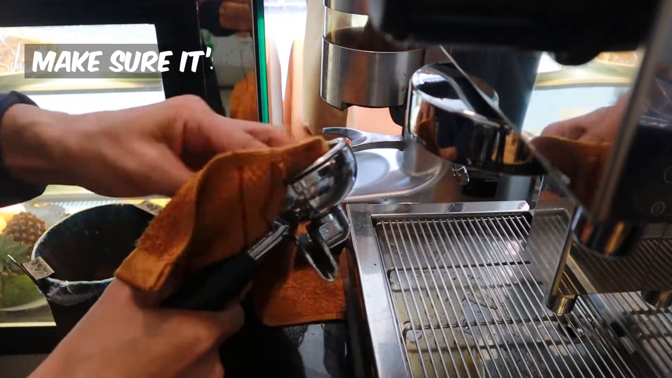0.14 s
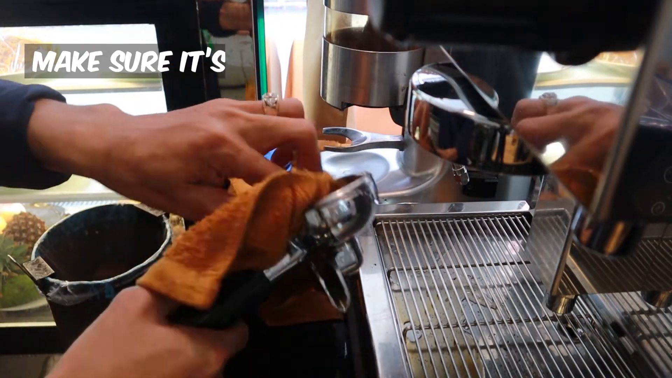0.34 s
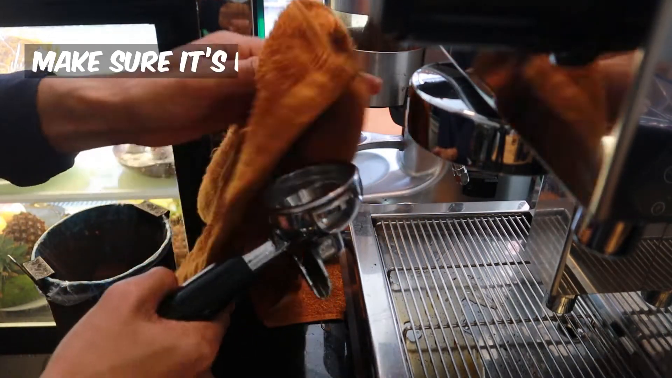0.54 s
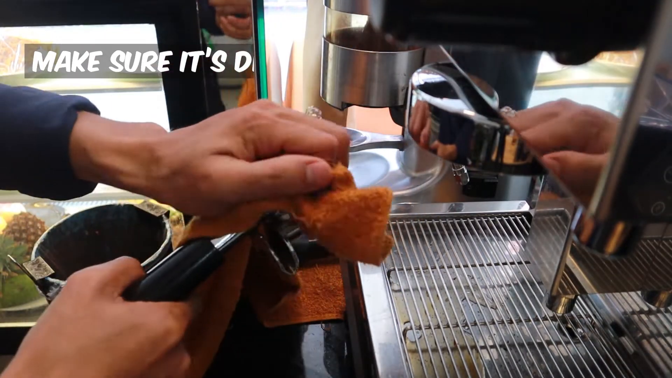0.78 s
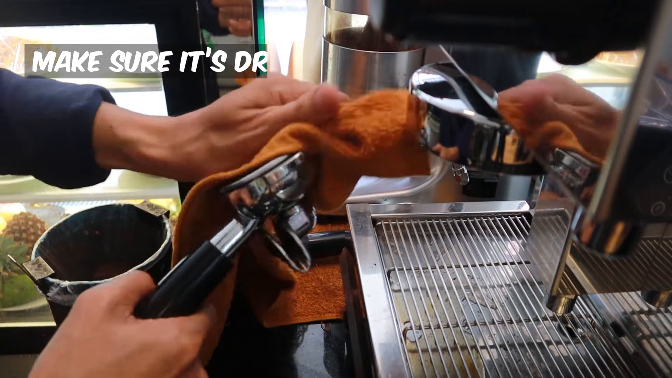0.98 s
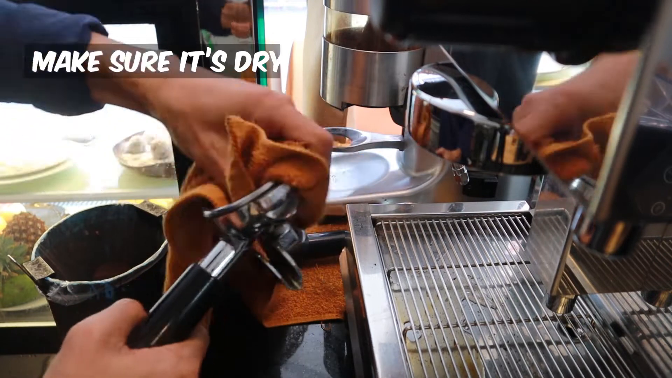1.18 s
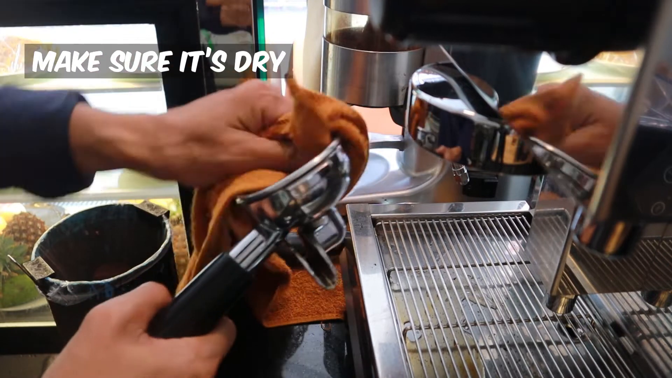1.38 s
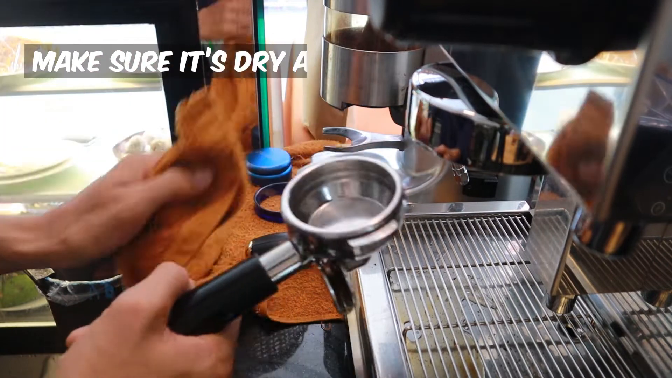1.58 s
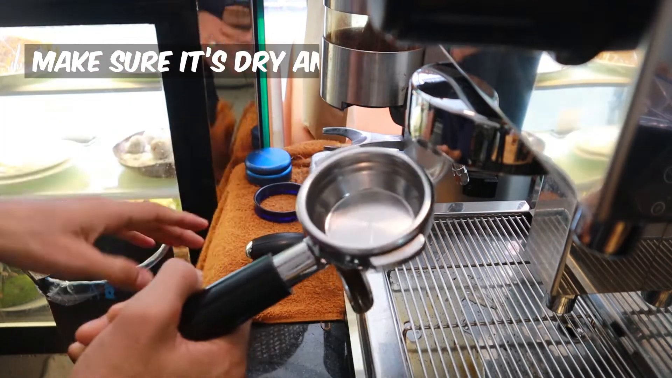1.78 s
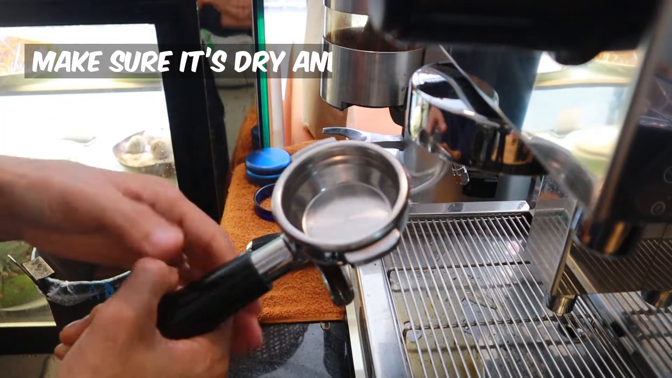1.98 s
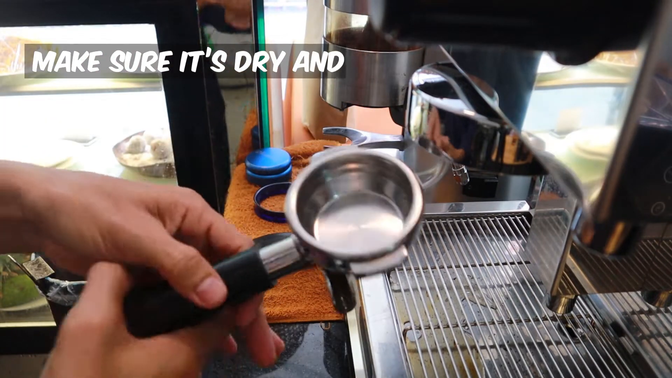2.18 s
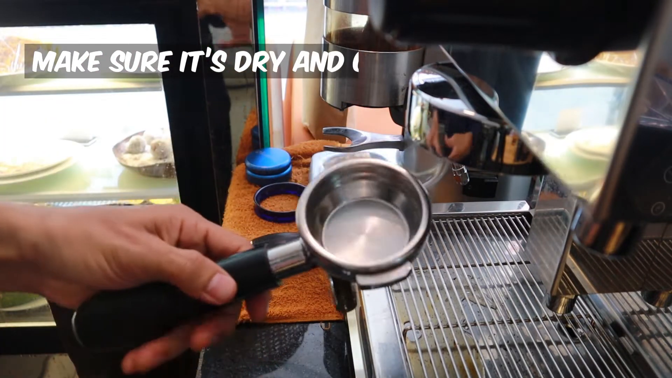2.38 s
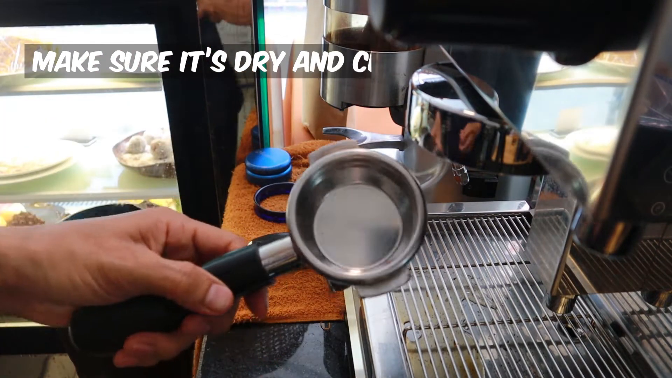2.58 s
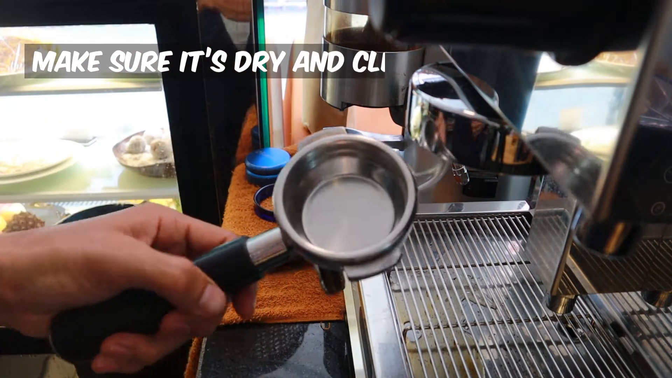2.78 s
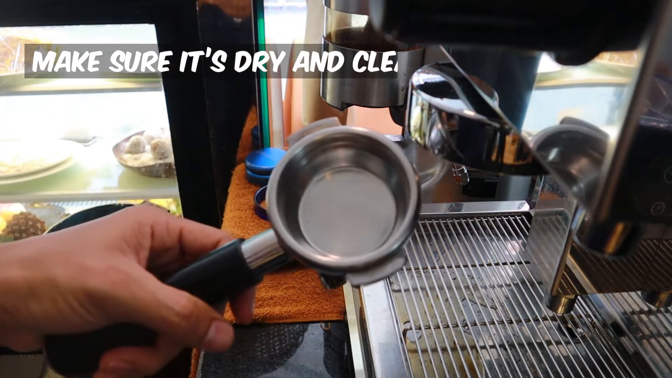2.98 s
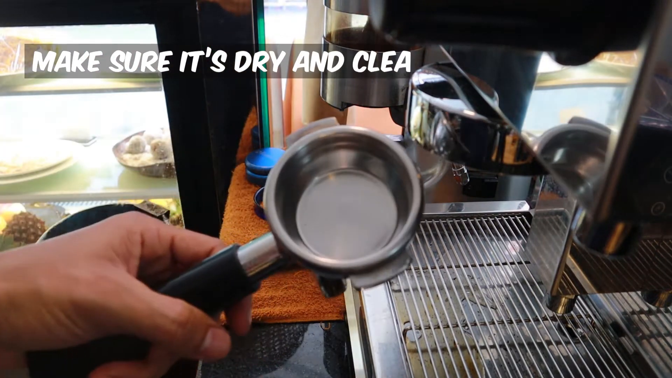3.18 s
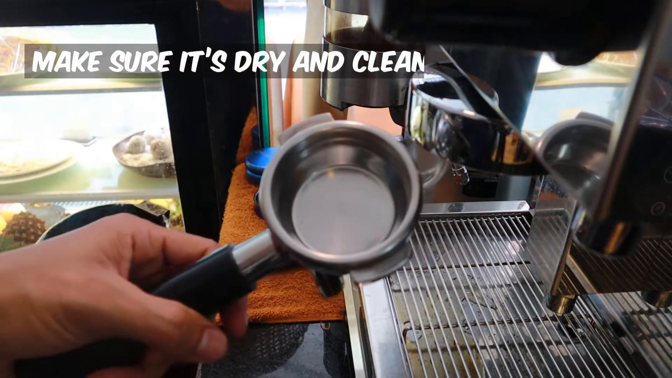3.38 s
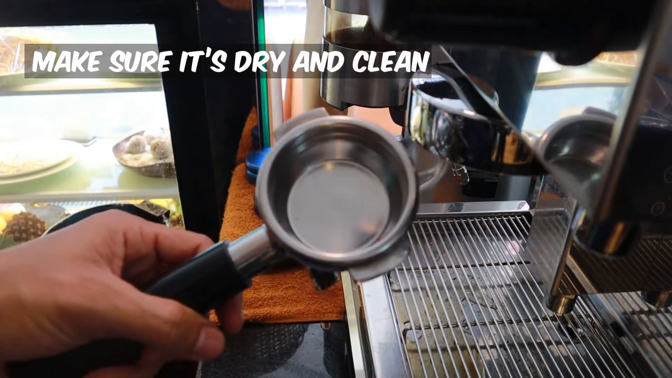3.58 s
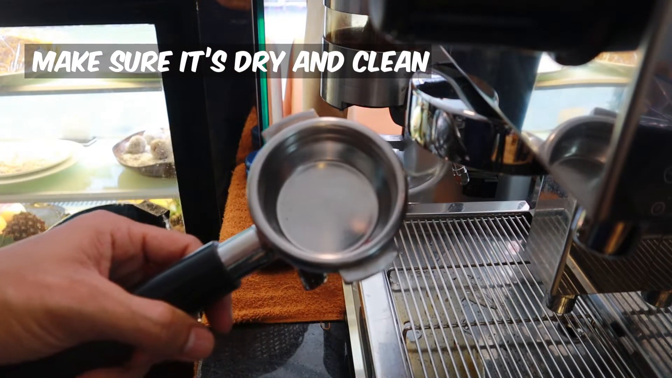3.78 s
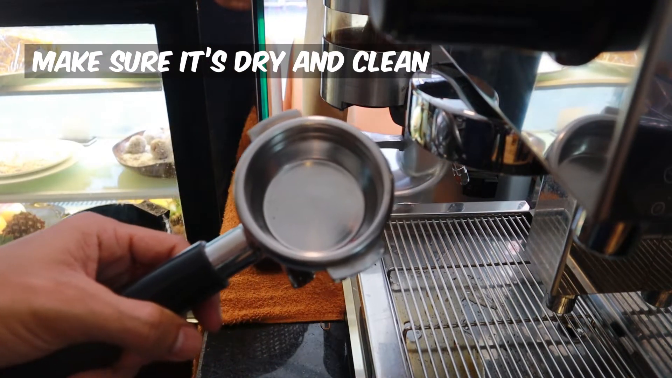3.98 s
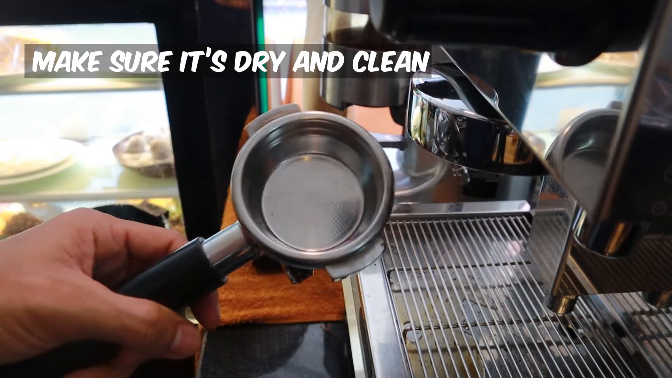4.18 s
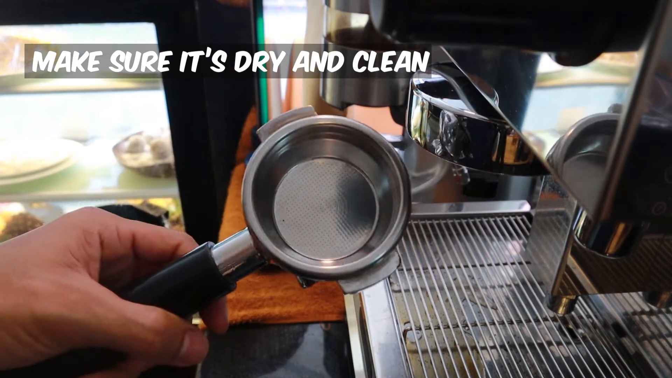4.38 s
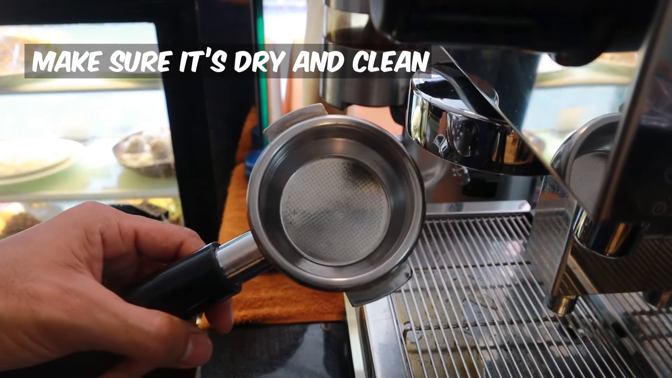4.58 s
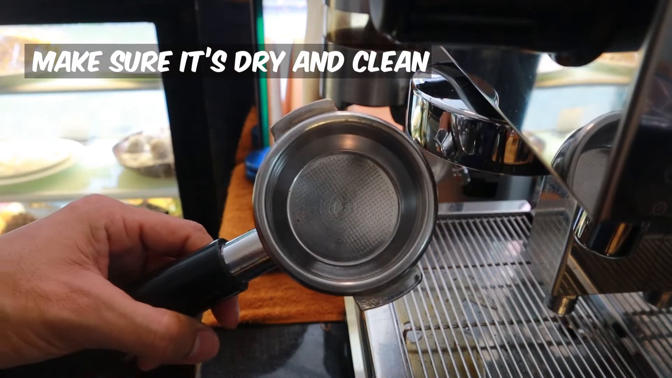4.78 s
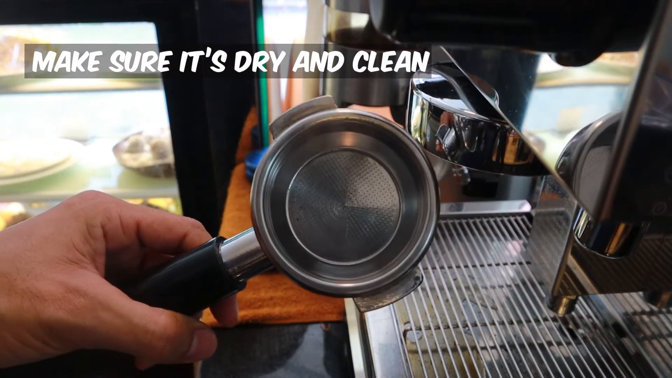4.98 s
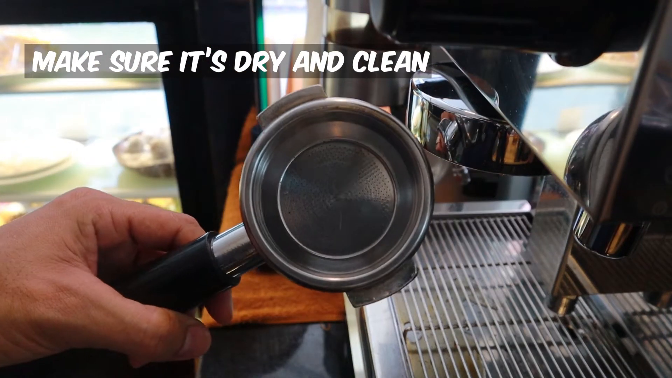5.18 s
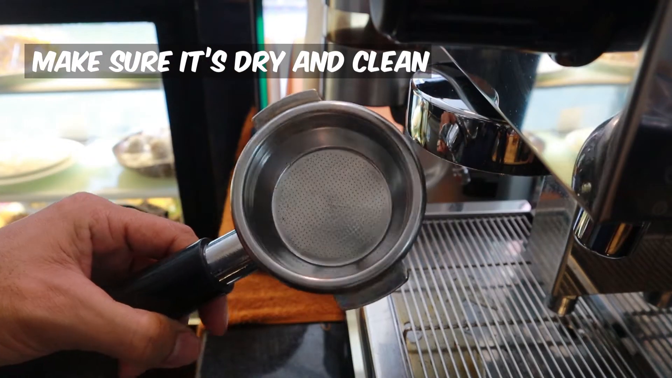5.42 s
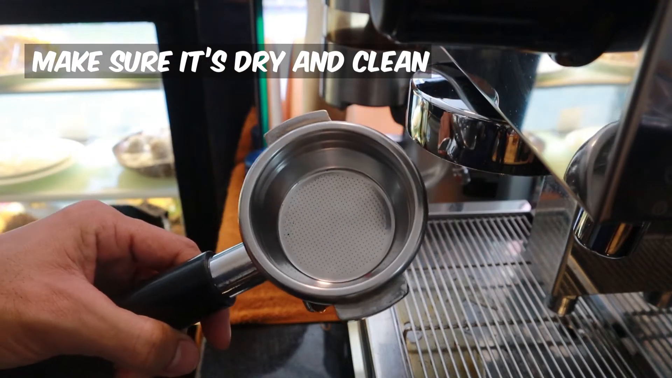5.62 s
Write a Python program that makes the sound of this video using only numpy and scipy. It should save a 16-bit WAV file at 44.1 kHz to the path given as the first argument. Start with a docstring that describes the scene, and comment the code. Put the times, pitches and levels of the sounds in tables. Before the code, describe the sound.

Close, dry wiping of a cloth inside a steel coffee filter basket. Short rasping strokes come several per second, each tipped with crisp metallic ticks and a rare tiny squeak. A dull, low, humming room lies underneath. After about 2.3 seconds comes a brief gap of near silence, then a second bout, slightly softer and ringier, ending just before 4 seconds; the rest is virtually silent. Nearly mono, centred, with hardly any echo.

```python
"""At a counter in a dull, humming room, a cloth is twisted in quick strokes inside a steel coffee filter basket.
Rasp: noise and sharp snags follow the strength of each stroke, and the steel cup rings along with them.
Snaps and squeaks: when the cloth slips free there is a tiny noise burst; when it chatters, a short tone.
Room: a wash of shaped noise with wavering hums lies under three bouts of wiping, the last two almost joined.
Between and after the bouts there is near silence."""
import sys
import numpy as np
from scipy import signal
from scipy.fft import rfft, irfft, next_fast_len
from scipy.io import wavfile
from scipy.ndimage import uniform_filter1d

SR = 44100
rng = np.random.default_rng(int(sys.argv[2]) if len(sys.argv) > 2 else 0)


def materialize(psi):
    """Save the field psi as 16-bit PCM at rate SR to the path in sys.argv[1].

    A 1-D psi becomes a single channel; in a 2-D psi each row is a channel.
    """
    bounded = np.clip(np.atleast_2d(psi).T, -1, 1)
    quanta = np.round(bounded * 32767).astype(np.int16)
    wavfile.write(sys.argv[1], SR, quanta)


N = 249160
TIME = np.arange(N) / SR
EDGE_HZ = 10100  # upper edge of the whole sound

# strokes of the cloth; build_db is the change in level from start to end:
# start_s, length_s, end_level_db, build_db
STROKES = [(0, 0.057, -45, -11.5), (0.171, 0.067, -42.5, 2), (0.263, 0.089, -39.5, 11.5),
           (0.437, 0.058, -35.5, 13.5), (0.519, 0.091, -39.5, 10.5), (0.749, 0.079, -39, 7),
           (0.829, .082, -36.5, 8.5), (0.974, 0.073, -36.5, 9), (1.075, 0.073, -34, 15),
           (1.265, 0.1, -38, 15.5), (1.393, 0.026, -35, 13.5), (1.543, .095, -38.5, 6.5),
           (1.654, 0.028, -36.5, 3.5), (1.752, 0.11, -38, 9), (1.874, 0.04, -39.5, -1),
           (1.98, 0.068, -38.5, 10), (2.079, 0.08, -40, 9), (2.185, 0.043, -55.5, -4),
           (2.231, 0.06, -40, 7), (2.585, 0.13, -43.5, 3.5), (2.724, 0.056, -41.5, -1.5),
           (2.806, 0.096, -42.5, -4.5), (3.024, 0.073, -38, 12.5), (3.168, 0.15, -43, 2.5),
           (3.331, 0.069, -45.5, -3.5), (3.415, 0.078, -44.5, -3.5), (3.525, 0.037, -43, -2.5),
           (3.569, 0.16, -40.5, -2), (3.81, 0.092, -37.5, 7.5), (3.886, 0.054, -40.5, 9.5)]
# bouts of wiping, with light brushing between the strokes:
# start_s, end_s, brushing_db, room_db
BOUTS = [(0, 2.346, -61, -59), (2.585, 3.765, -57, -57.5), (3.794, 3.947, -53, -57.5)]
# overall tone of the rasp; only the differences between levels count:
# pitch_hz, level_db
RASP_TONE = [(100, -11), (350, -11), (550, -3.5), (900, -5), (1800, 0.5), (2900, -0.5), (4400, -3),
             (5400, -9.5), (6200, -13), (7100, -19.5), (7800, -28.5), (9200, -36.5), (10200, -61)]
# resonances of the cup and its holder, before the cup opens or closes:
# pitch_hz, width_hz, level_db
CUP_RESONANCES = [(1231, 70, -1), (1286, 49, 9), (1387, 70, 7), (1450, 40, 1), (2050, 210, -4.5),
                  (3570, 83, -3.5), (5400, 450, -0.5), (6600, 600, -8.5)]
# how freely the cup rings under the cloth:
# time_s, level_db
CUP_OPENNESS = [(0, -2), (2.7, 4), (3.7, 2), (3.85, 0)]
# moments when the cloth slips free; swell_s sets both the rise and the fall, rim_db is rim over cup:
# middle_s, level_db, swell_s, rim_db
SNAPS = [(0.029, -29, 0.0026, 2), (.175, -37, 0.00096, -8), (.222, -30, 0.0016, -5),
         (0.2516, -16.5, 0.00068, 8), (0.2962, -41, .0027, -2.5), (0.3313, -32.5, 0.0015, 6),
         (0.3485, -25, 0.002, 5.5), (0.4495, -38, 0.0013, -4.5), (0.4994, -23, 0.0015, 3.5),
         (0.555, -39.5, 0.0043, -1), (0.5832, -33, 0.0008, -3.5), (0.606, -24.5, 0.0028, 10.5),
         (0.761, -41, 0.0018, -8.5), (0.8171, -16.5, 0.00053, 11), (0.9095, -23.5, 0.0018, 8.5),
         (1.0458, -23.5, 0.0017, 7.5), (1.093, -35, 0.0019, -10), (1.144, -23.5, 0.00094, 9),
         (1.2962, -37, 0.0011, -10), (1.3249, -33, 0.0016, -2), (1.345, -21.5, 0.0011, 9.5),
         (1.401, -31, .0026, -3.5), (1.4188, -23.5, 0.0011, -12), (1.615, -24.5, 0.0013, 7.5),
         (1.689, -23.5, 0.0019, 6), (1.7683, -37.5, 0.0029, -9), (1.8255, -21, .0013, 6),
         (1.9081, -21.5, .0012, 5), (2.055, -21.5, 0.00078, 1), (2.1055, -36.5, 0.0028, 0),
         (2.154, -25, 0.0016, 0.5), (2.2364, -39, 0.00097, 3), (2.2665, -33.5, 0.0016, -5.5),
         (2.2849, -24, 0.0021, 1), (2.587, -39, 0.00048, -8), (2.7345, -37.5, 0.0016, -14.5),
         (2.7509, -20.5, 0.00096, 0), (2.8065, -34, 0.003, -7), (2.8253, -28, 0.0016, 3),
         (2.8797, -34.5, 0.0028, -26), (2.8966, -24, 0.00081, -2), (3.0331, -35, 0.00046, 0.5),
         (3.1, -21.5, 0.00095, -1.5), (3.2362, -27, 0.0023, -1), (3.3112, -24, 0.00092, -3.5),
         (3.3787, -30, .0014, -6), (3.418, -24.5, 0.0016, 1.5), (3.4739, -31.5, 0.0004, 2.5),
         (3.524, -25, 0.0016, -3), (3.5966, -22, 0.00088, -1), (3.648, -41, 0.0014, 6.5),
         (3.669, -24.5, 0.0016, -6.5), (3.74, -23.5, .0011, -5.5), (3.8034, -46, 0.0016, 10),
         (3.8643, -38, 0.00063, 0), (3.8814, -34.5, .01, -0.5), (3.94, -36, 0.0019, 16)]
# tone of the three parts of a snap; only the differences between levels count:
# pitch_hz, level_db
SNAP_CUP_TONE = [(100, -25.5), (400, -22), (850, -14), (1150, -2.5), (1400, 2), (1750, -4.5), (2200, -21.5),
                 (3500, -59.5)]
SNAP_RIM_TONE = [(1200, -40.5), (1750, -7.5), (2150, 9.5), (2600, -1), (3100, -12), (4200, -53)]
SNAP_SIZZLE_TONE = [(1900, -37), (2800, -2.5), (3600, 3.5), (4400, 1), (5300, 4), (6200, -8), (7100, -5.5),
                    (8000, -17.5), (8900, -21), (10200, -59)]
# short squeaks of cloth chattering on steel; swell_s sets both the rise and the fall:
# middle_s, peak_db, pitch_hz, swell_s
SQUEAKS = [(.029, -31, 2020, 0.0023), (0.063, -38, 1797, 0.0059), (0.085, -48.5, 1855, 0.015),
           (.361, -44, 905, 0.0064), (1.421, -20.5, 2205, 0.0024), (1.85, -30.5, 1420, 0.0031),
           (2.618, -39, 1350, 0.0044), (2.705, -39, 1140, .005), (2.851, -37, 1360, 0.0062),
           (2.969, -49, 2260, 0.0055), (3, -35.5, 995, 0.0035), (3.077, -32, 1370, 0.0044),
           (3.188, -29, 1385, 0.003), (3.353, -35, 1440, 0.0048), (3.722, -37.5, 1280, 0.0047)]
# tone of the room's wash; only the differences between levels count:
# pitch_hz, level_db
ROOM_TONE = [(20, -17.5), (55, -1.5), (100, 1.5), (150, -1), (260, -1), (380, -1.5), (1400, 0), (2500, -12),
             (5000, -30.5), (7500, -39), (10000, -57.5)]
# unsteady hums of machines, compared with the wash; the first also gets LOW_HUM_LIFT:
# pitch_hz, level_db
HUMS = [(95, -11.5), (212, -17.5), (305, -15), (500, -14), (609, -19.5)]
# changing lift of the first, lowest hum:
# time_s, lift_db
LOW_HUM_LIFT = [(0, -5.5), (.9, -6), (1.2, 4), (2.3, -0.5), (2.9, -5.5), (3.6, 3), (3.9, 4.5)]

# how quickly strokes and bouts begin, how fast a stroke dies away, how slowly a bout fades
GRIP_S, RELEASE_DB_PER_S, BOUT_FADE_S = .008, 521, 0.018
ROOM_REST_DB = -104  # the wash outside the bouts
# a snap sizzles more the harder it is, the more it rings the rim and the later it comes
SIZZLE_DB, SIZZLE_PER_DB, SIZZLE_PER_RIM_DB, SIZZLE_DB_PER_S = 7.5, 0.18, 0.38, 0.78


def rasp(lump_db=1, lump_hz=70, grain_db=0.5, grain_hz=600, snags_per_s=70, snag_size=7,
         drift=0.00591, soft_db=-56, soft_slope=0.27, level_db=-0.6, cup_swing_db=2):
    """Countless fibres slip in clumps and a few snag; a barely touching cloth loses its rasp."""
    rub_db = rubbing()
    # below soft_db the sound weakens faster than the rubbing
    force = amp(rub_db - soft_slope * np.maximum(soft_db - rub_db, 0))
    touching = np.clip((rub_db + 78) / 6, 0, 1)
    clumps = amp(lump_db * wander(lump_hz) + grain_db * wander(grain_hz))
    weave, steel = clumps * rng.standard_normal((2, N))
    is_snag = rng.random(N) < snags_per_s / SR
    snags = snag_size * rng.standard_normal(N) * is_snag
    # the cup rings unevenly as folds cover it
    openness = amp(np.interp(TIME, *np.transpose(CUP_OPENNESS)) + cup_swing_db * wander(25))
    cup = openness * basket(steel, 1 + drift * wander(3.7))
    friction = folds(weave + snags + cup)
    return amp(level_db) * force * touching * unit(colour(friction, RASP_TONE))


def rubbing():
    """How hard the cloth rubs, in dB: each stroke grips, changes in force and lets go, over light brushing."""
    force = sum(amp(brush_db) * bout(start, end) for start, end, brush_db, _ in BOUTS)
    for start, length, end_db, build_db in STROKES:
        t = TIME - start
        build = build_db * (np.clip(t / length, 0, 1) - 1)
        release = RELEASE_DB_PER_S * np.maximum(t - length, 0)
        grip = np.clip(t / GRIP_S, 0, 1)
        force = np.maximum(force, grip * amp(end_db + build - release))
    return 20 * np.log10(force + 1e-9)


def folds(x, depth_db=0.64, shift_hz=14, count=6):
    """Folds of cloth come and go under the fingers, so each band of the rasp swells on its own."""
    centres = np.geomspace(800, 8000, count)
    size = next_fast_len(N)
    hz = np.fft.rfftfreq(size, 1 / SR)
    place = np.interp(np.log(hz + 1), np.log(centres), np.arange(count))
    spectrum = rfft(x, size)
    mix = np.zeros(N)
    for k in range(count):
        # neighbouring bands overlap like triangles
        share = np.maximum(1 - abs(place - k), 0)
        band = irfft(spectrum * share, size)[:N]
        mix += band * amp(depth_db * wander(shift_hz))
    return mix


def basket(x, shift=1):
    """The steel cup rings at its own pitches, which move up and down together with the shift factor."""
    rings = 0
    for hz, width_hz, db in CUP_RESONANCES:
        # turn the resonance down to zero pitch, smooth there, then turn it back
        turn = np.exp(2j * np.pi * np.cumsum(hz * shift * np.ones(N)) / SR)
        r = np.exp(-np.pi * width_hz / SR)
        ring = turn * signal.lfilter([1 - r], [1, -r], x / turn)
        rings = rings + amp(db) * 2 * ring.real
    return rings


def snaps(ring_db=-14, steepness=1.2, size=4096):
    """Each snap is a burst of tiny slips that swells and dies quickly; the cup rings 2 ms later."""
    out = np.zeros(N)
    t = (np.arange(size) - size // 2) / SR
    below_edge = np.fft.rfftfreq(size, 1 / SR) < EDGE_HZ
    for s, db, spread, rim_db in SNAPS:
        sizzle_db = SIZZLE_DB + SIZZLE_PER_DB * db + SIZZLE_PER_RIM_DB * rim_db + SIZZLE_DB_PER_S * s
        swell = np.exp(-(abs(t) / spread) ** steepness)
        slips = swell * rng.standard_normal(size)
        # the slips fill the burst evenly, both in frequency and in time
        for _ in range(5):
            even = np.exp(1j * np.angle(rfft(slips))) * below_edge
            slips = swell * np.cos(np.angle(np.fft.ifft(even, size)))
        cup = unit(colour(slips, SNAP_CUP_TONE))
        rim = amp(rim_db) * unit(colour(slips, SNAP_RIM_TONE))
        sizzle = amp(sizzle_db) * unit(colour(slips, SNAP_SIZZLE_TONE))
        snap = cup + rim + sizzle
        # give the snap the same energy as its swell before setting the level
        add(out, s, amp(db) * snap * np.linalg.norm(swell) / np.linalg.norm(snap))
    delay = np.zeros(SR // 500)
    return out + amp(ring_db) * np.r_[delay, basket(out)][:N]


def glint(x, band_hz=(4800, 5700), share=(-.25, .4)):
    """The steel's bright ring is muffled early on and stands out more and more over four seconds."""
    band = signal.butter(1, band_hz, "bandpass", fs=SR, output="sos")
    return x + np.interp(TIME, [0, 4], share) * signal.sosfiltfilt(band, x)


def squeaks(jitter=.04, size=4096):
    """The cloth briefly sticks and slips at a slightly unsteady pitch."""
    out = np.zeros(N)
    t = (np.arange(size) - size // 2) / SR
    for s, db, hz, spread in SQUEAKS:
        unsteady = unit(uniform_filter1d(rng.standard_normal(size), size=64))
        pitch = hz * (1 + jitter * unsteady)
        tone = np.sin(2 * np.pi * np.cumsum(pitch) / SR)
        add(out, s, amp(db) * np.exp(-abs(t) / spread) * tone)
    return out


def echoes(x, t60=0.042, wet_db=-19, size=8192):
    """The counter and the machine scatter a short, faint tail that falls 60 dB in t60 seconds."""
    t = np.arange(size) / SR
    is_echo = (rng.random(size) < .06) * (t > .003)
    taps = rng.standard_normal(size) * is_echo * amp(-60 * t / t60)
    return amp(wet_db) * signal.fftconvolve(x, taps / np.linalg.norm(taps))[:N]


def room_tone(waver_hz=12):
    """A dull wash with wavering machine hums in it; it comes and goes with the bouts of wiping."""
    hums = []
    for hz, hum_db in HUMS:
        # two waves a quarter turn apart, each wandering in level, make one unsteady hum
        cosine = wander(waver_hz) * np.cos(2 * np.pi * hz * TIME)
        sine = wander(waver_hz) * np.sin(2 * np.pi * hz * TIME)
        hums.append(amp(hum_db) * unit(cosine + sine))
    wash = unit(colour(rng.standard_normal(N), ROOM_TONE))
    low_hum = amp(np.interp(TIME, *np.transpose(LOW_HUM_LIFT))) * hums[0]
    level = amp(ROOM_REST_DB) + sum(amp(db) * bout(start, end) for start, end, _, db in BOUTS)
    return level * (wash + low_hum + sum(hums[1:]))


def bout(start, end):
    """Level of one bout: it opens quickly at its start and fades after its end."""
    fade = np.exp(-(np.maximum(TIME - end, 0) / BOUT_FADE_S) ** 2 / 2)
    return np.clip((TIME - start) / GRIP_S, 0, 1) * fade


def amp(db):
    """Turns decibels into a gain."""
    return 10 ** (np.asarray(db) / 20)


def unit(x):
    """Scales a sound to an average (rms) strength of one."""
    return x / np.sqrt(np.mean(x ** 2) + 1e-30)


def gains(points, hz):
    """Reads a tone table as gains, drawing straight lines in dB over log frequency."""
    f, db = np.transpose(points)
    return amp(np.interp(np.log(hz + 1), np.log(f), db))


def colour(x, points):
    """Filters a sound by a tone table."""
    size = next_fast_len(len(x))
    hz = np.fft.rfftfreq(size, 1 / SR)
    return irfft(rfft(x, size) * gains(points, hz), size)[:len(x)]


def wander(rate_hz):
    """Random motion of unit size, mostly slower than the given rate."""
    size = next_fast_len(N)
    hz = np.fft.rfftfreq(size, 1 / SR)
    slow = rfft(rng.standard_normal(size)) / (1 + (hz / rate_hz) ** 4)
    return unit(irfft(slow, size)[:N])


def add(mix, s, sound):
    """Adds a short sound with its middle at s seconds."""
    at = round(s * SR) - len(sound) // 2 + np.arange(len(sound))
    inside = (at >= 0) & (at < N)
    mix[at[inside]] += sound[inside]


def scene(side_db=-31):
    """All of it is straight ahead; the sound only trembles faintly between the ears."""
    slips = glint(snaps()) + squeaks()
    mid = rasp() + slips + echoes(slips) + room_tone()
    side = amp(side_db) * mid * wander(400)
    return np.array([mid + side, mid - side])


def record(dry, hiss_db=-116, offset=.0014):
    """Adds a faint hiss, cuts everything above the upper edge and adds a small steady offset."""
    heard = dry + amp(hiss_db) * rng.standard_normal(dry.shape)
    lowpass = signal.firwin(511, EDGE_HZ, window=("kaiser", 9), fs=SR)
    return signal.oaconvolve(heard, lowpass[None], "same") + offset


dry = scene()
out = record(dry)
materialize(out)
```